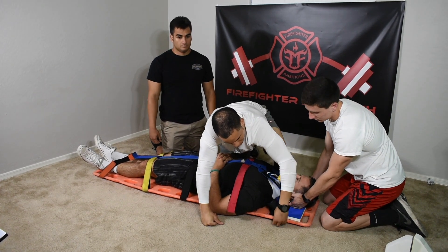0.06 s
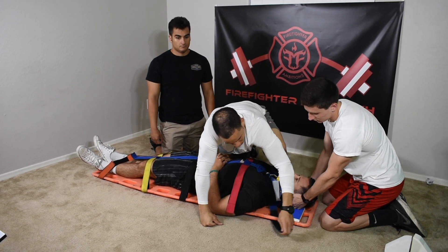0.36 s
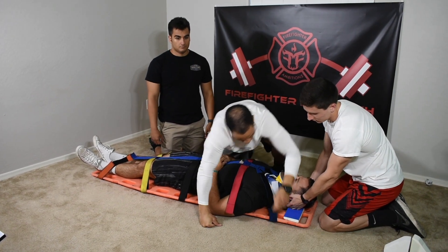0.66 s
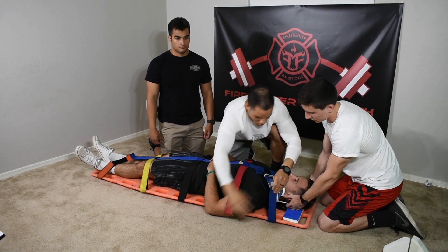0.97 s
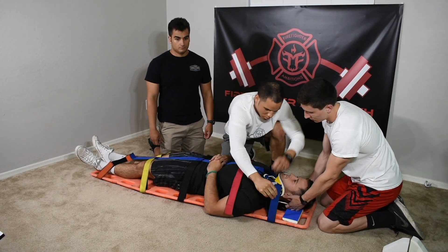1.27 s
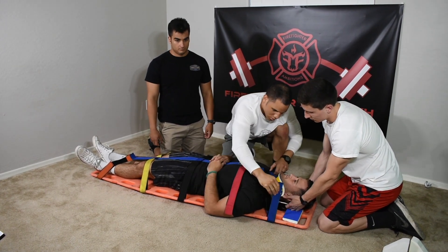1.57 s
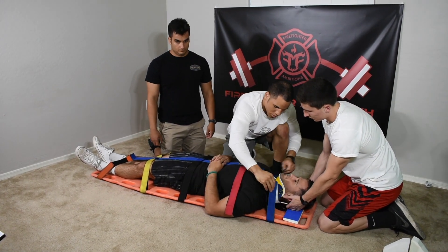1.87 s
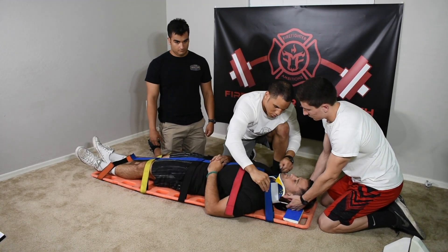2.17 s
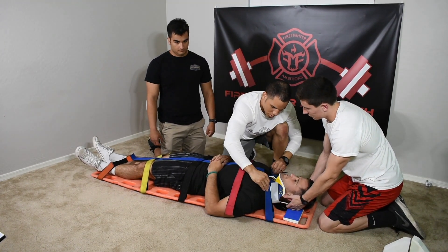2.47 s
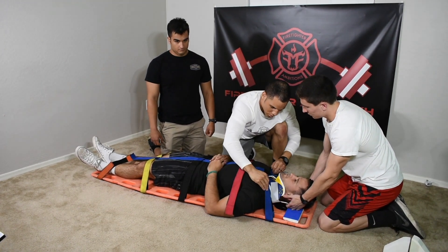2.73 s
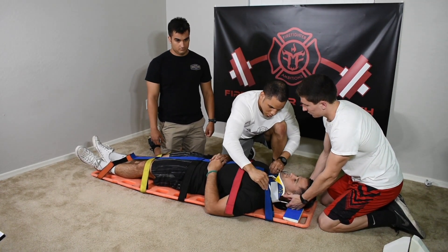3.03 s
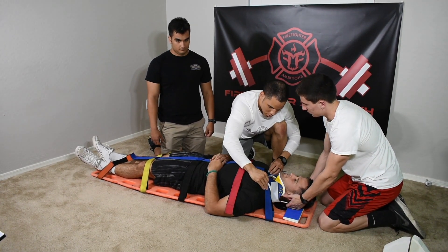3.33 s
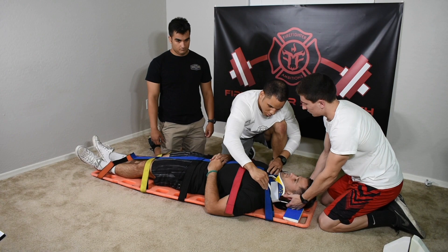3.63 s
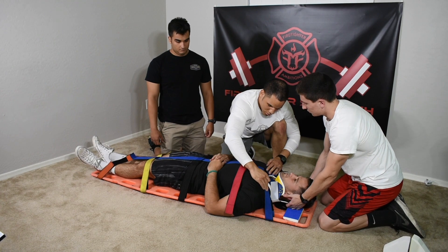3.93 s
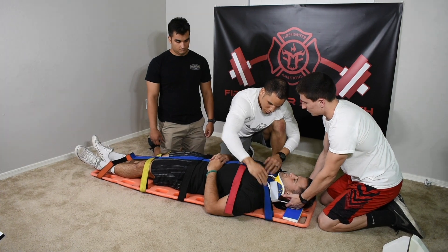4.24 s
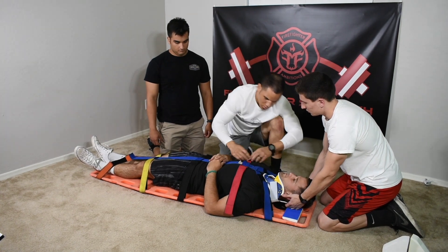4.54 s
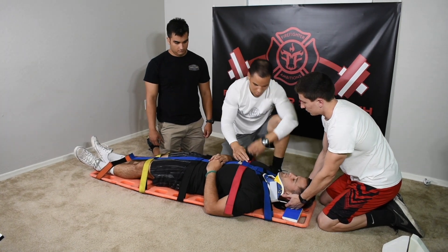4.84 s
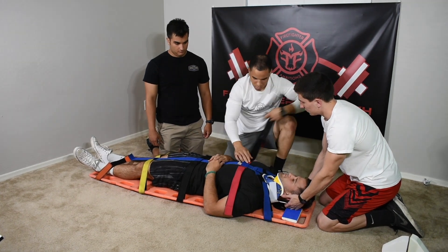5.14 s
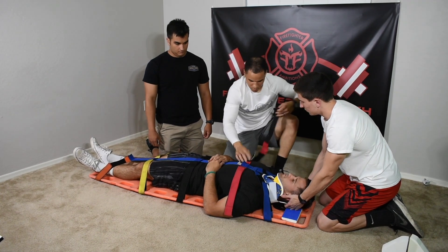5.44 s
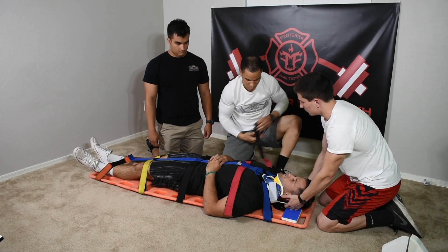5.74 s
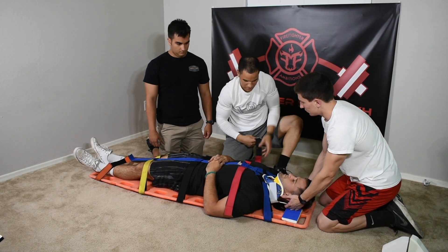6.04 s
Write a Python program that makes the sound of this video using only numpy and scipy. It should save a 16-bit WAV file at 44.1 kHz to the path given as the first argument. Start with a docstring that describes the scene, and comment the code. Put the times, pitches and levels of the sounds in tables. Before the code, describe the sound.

Hook-and-loop straps are pulled open close to the microphone in a small room. First comes a brief scratchy rip, then rustling cloth, a light bump on a plastic collar and a second, sharply crackling rip. Quiet scuffs and ticks of single hooks follow, until a longer tearing rip of about half a second. Rustling and faint squeaks finish it, with a low hum and slight hiss underneath throughout.

```python
"""Hook-and-loop straps are pulled open on a person lying on a rescue board in a small carpeted room.
From the start an appliance hums under a faint hiss, and sleeves and webbing rustle. At 0.4 s a strap rips
briefly as a shower of tiny hooks lets go; then a knee shifts on the floor. Single hooks tick, a plastic
neck collar is bumped and scuffed, and at 1.9 s a strap is jerked open. Softer handling follows until the
longest rip, from 4.8 to 5.3 s. Near the end, cloth squeaks faintly on plastic."""
import sys
import numpy as np
from scipy import signal
from scipy.fft import rfft, irfft
from scipy.io import wavfile
from scipy.ndimage import uniform_filter1d

SR = 44100
rng = np.random.default_rng(int(sys.argv[2]) if len(sys.argv) > 2 else 0)


def wrap_up_sound(samples):
    """Save the sound to the file named by the first command line argument, as 16-bit audio."""
    columns = np.atleast_2d(samples).T
    # keep every value between -1 and 1, then stretch to whole-number steps
    tamed = np.clip(columns, -1, 1)
    steps = np.round(tamed * 32767).astype(np.int16)
    wavfile.write(sys.argv[1], SR, steps)


N = 273420  # samples: 6.2 s


def amp(db):
    """Turns decibels into a factor to multiply by."""
    return 10 ** (np.asarray(db) / 20)


def evened(x):
    """Scales a signal to an average power of 1."""
    return x / np.sqrt(np.mean(x ** 2) + 1e-20)


def read(points, hz):
    """Looks up frequencies in a table, giving every octave equal space."""
    f, value = np.transpose(points)
    return np.interp(np.log(hz + 1), np.log(f + 1), value)


def add(mix, s, sound):
    """Mixes a sound in, starting at s seconds."""
    part = mix[max(round(s * SR), 0):][:len(sound)]
    part += sound[:len(part)]


def split_click(spectrum, low_hz=700, high_hz=6000, size=4096):
    """A click with this tone colour, split into bass, middle and treble of equal energy."""
    hz = abs(np.fft.fftfreq(size, 1 / SR))
    log_gain = np.log(amp(np.maximum(read(spectrum, hz), -70)))
    click = np.exp(signal.hilbert(log_gain).conj())  # a sharp start, then the ring
    low, high = (1 / (1 + (hz / edge) ** 8) for edge in (low_hz, high_hz))
    bands = np.array([low, high - low, 1 - high])
    parts = np.fft.fftshift(np.fft.ifft(click * bands).real, axes=1)
    return parts / np.linalg.norm(parts, axis=1, keepdims=True)


def play_clicks(kicks, clicks, levels_db):
    """Every kick sets off a click, with its own levels for bass, middle and treble."""
    start = clicks.shape[1] // 2
    return sum(signal.fftconvolve(kicks * amp(db), click)[start:] for db, click in zip(levels_db, clicks))


def shower(count, per_s, spread_db):
    """Tiny kicks of uneven size at random moments, about per_s of them a second."""
    chance = per_s / SR
    sizes = evened(amp(spread_db * np.minimum(rng.exponential(1, count), 3)))
    signs = rng.choice([-1, 1], count)
    happens = rng.random(count) < chance
    return sizes * signs * happens / np.sqrt(chance)


def fuzzy_tone(hz, width_hz):
    """A soft swell of narrow noise that follows the pitch curve hz."""
    smoothing = signal.butter(2, width_hz / 2, fs=SR, output="sos")
    wobble = signal.sosfilt(smoothing, rng.standard_normal((len(hz), 2)) @ [1, 1j])
    tone = np.exp(2j * np.pi * np.cumsum(hz) / SR)
    return evened((wobble * tone).real) * signal.windows.tukey(len(hz), .5)


# tone colour of the room's hiss and of the microphones' own noise: f/Hz, relative level/dB
AIR_COLOUR = [(15, -65), (25, -37), (36, -13.5), (59, -6), (87, -7.5), (108, -5), (223, -6.5), (249, -14),
              (317, -6), (531, -10), (840, -13), (988, -11.5), (2280, -18.5), (16000, -23.5)]
MIC_COLOUR = [(18, -41), (30, -11), (90, 7), (168, 2), (213, 10.5), (5040, -11.5), (9190, -25), (11300, -4),
              (15500, -6.5)]
def hiss(colour):
    """Steady noise with this tone colour."""
    hz = np.fft.rfftfreq(N, 1 / SR)
    white = rfft(rng.standard_normal(N))
    return evened(irfft(white * amp(read(colour, hz)), N))


# how loud the appliance's lowest note is: t/s, level/dB
HUM_LEVELS = [(0, -70), (1.6, -70), (2.1, -62), (3.1, -64.5), (4.0, -67.5), (5.4, -61.5), (6.2, -68)]
def hum(mains_hz=60, beat_s=1.097, dip_s=2.61, motor_db=-8.5):
    """Mains hum and a slightly slower motor throb together, under a wavering note an octave up."""
    t = np.arange(N) / SR
    phase = 2 * np.pi * mains_hz * t
    lag = 2 * np.pi * (t - dip_s) / beat_s
    motor = amp(motor_db) * np.sin(phase - lag)
    drone = amp(np.interp(t, *np.transpose(HUM_LEVELS))) * (np.sin(phase) - motor)
    waver = evened(sum(np.sin(2 * np.pi * (f * t + rng.random())) for f in np.geomspace(.5, 7, 20)))
    octave = amp(-63.5 + 1.8 * waver) * np.sin(2 * phase + 0.19 * waver)
    return np.sqrt(2) * (drone + octave)


# how long the room takes to fade by 60 dB: f/Hz, fade/s
ROOM_FADE = [(120, 0.5), (300, 0.48), (700, 0.46), (2000, 0.35), (5000, 0.37), (9000, 0.3), (15000, 0.64)]
# echoes from nearby surfaces: delay/s, level/dB
NEAR_ECHOES = [(.0013, -12.5), (.0043, -19.5), (.0062, -25), (.0078, -9), (0.0122, -7), (0.0175, -26.5)]
def reflections(tail_db, early_db=5, early_s=0.067):
    """The room's answer to a click: a few near echoes and a dense tail that falls fast at first."""
    count = SR // 2
    hz, t, noise = signal.stft(rng.standard_normal(count), SR, nperseg=256)
    fall_db = -60 * t / read(ROOM_FADE, hz)[:, None] + early_db * np.exp(-t / early_s)
    tail = signal.istft(noise * amp(fall_db), SR, nperseg=256)[1][:count]
    tail *= np.clip(np.arange(count) / SR / 0.0023, 0, 1)
    response = amp(tail_db) * tail / np.linalg.norm(tail)
    for s, db in NEAR_ECHOES:
        add(response, s * rng.uniform(.8, 1.2), amp([db]))
    return response


def room(x, tail_db, spots=6, rounds_per_s=9):
    """Hooks and fibres sound from many spots, so the sound cycles through several echo patterns."""
    spot = rounds_per_s * spots * np.arange(N) / SR
    echoes = np.zeros(N)
    for k in range(spots):
        response = reflections(tail_db)
        away = (spot - k + spots / 2) % spots - spots / 2
        share = np.cos(np.pi / 2 * np.clip(away, -1, 1))
        echoes += signal.fftconvolve(x * share, response)[:N]
    return (x + echoes) / np.sqrt(1 + np.sum(response ** 2))


# a knee shifts on the carpet: t/s, length/s, f/Hz, level/dB
KNEE_SHIFT = (0.8, 0.8, 95.5, -59.5)
def knee():
    """The floor answers a shift of weight with a soft, low rumble."""
    out = np.zeros(N)
    s, length, hz, db = KNEE_SHIFT
    add(out, s, amp(db) * fuzzy_tone(np.full(int(length * SR), hz), width_hz=24))
    return out


# cloth rubs on plastic: t/s, length/s, first f/Hz, last f/Hz, level/dB
CLOTH_SQUEAKS = [(5.861, 0.055, 621, 520, -56), (6.082, 0.059, 1222, 1297, -54.5),
                 (6.127, 0.08, 2265, 1860, -52)]
def squeaks():
    """The ribs of the weave pass an edge: a fuzzy whistle whose pitch follows their speed."""
    out = np.zeros(N)
    for s, length, first_hz, last_hz, db in CLOTH_SQUEAKS:
        glide_hz = np.geomspace(first_hz, last_hz, int(length * SR))
        add(out, s, amp(db) * fuzzy_tone(glide_hz, width_hz=0.13 * first_hz))
    return out


# the notes of the hollow collar: f/Hz, level/dB
COLLAR_NOTES = [(283, -0.5), (335, -6), (428, -11), (570, -19.5)]
# pushes on the collar: t/s, level/dB, length/s
COLLAR_BUMPS = [(1.71, -30, 0.032), (2.322, -49, 0.029), (4.27, -44, 0.035)]
def bumps():
    """The hollow collar sounds while it is pushed; the hand stills it straight after."""
    out = np.zeros(N)
    for s, db, length in COLLAR_BUMPS:
        t = np.arange(int(length * SR)) / SR
        ring = sum(amp(note_db) * np.sin(2 * np.pi * hz * t) for hz, note_db in COLLAR_NOTES)
        add(out, s, amp(db) * ring * signal.windows.tukey(len(t), .5))
    return out


# the small rustle as bodies shift and settle: t/s, level/dB
FIDGET_LEVELS = [(0, -60), (1.1, -54), (1.7, -53.5), (2.25, -61), (3.0, -62.5), (3.5, -58), (4.08, -65),
                 (4.5, -56.5), (5.75, -60), (6.1, -56)]
# a sleeve or webbing slides: centre t/s, length/s, level/dB, extra bass/dB, extra treble/dB
CLOTH_SLIDES = [(0.032, 0.12, -52.5, 4.5, -3), (0.073, 0.1, -51.5, 7, -3), (0.105, 0.14, -44.5, -3.5, -4.5),
                (0.447, 0.46, -53, 3, -2), (0.684, 0.085, -47.5, -10, -3), (0.79, 0.25, -44, -6, 2.5),
                (1.033, 0.27, -57, -1, 1), (1.262, 0.11, -48, 1, 1), (1.363, 0.2, -45, -25, 3),
                (1.546, 0.19, -53.5, 2, 12), (1.63, 0.13, -51, 2, 6.5), (1.716, 0.15, -47, -6, 6.5),
                (2.355, 0.11, -55.5, -2.5, 8.5), (2.536, 0.17, -61.5, -5, 9.5), (2.84, 0.29, -56.5, -7, -4),
                (3.297, 0.34, -55, -8, -5), (3.64, 0.14, -52.5, -4, 3), (3.909, 0.085, -54, -11, -2),
                (4.255, 0.13, -53.5, 4.5, 10), (4.31, 0.22, -51, 1, -3), (4.756, 0.44, -49, -26, 2),
                (5.418, 0.66, -52, -1.5, 1), (5.875, 0.092, -49, -7, 1.5), (5.933, 0.08, -52, -8, 2),
                (6.2, 0.31, -47, -20, 2.5)]
def cloth_levels(skew=0.96, roundness=1.82):
    """Bass, middle and treble of the cloth in dB: each slide swells and fades over the small rustle."""
    t = np.arange(N) / SR
    fidget_db = np.interp(t, *np.transpose(FIDGET_LEVELS))
    power = amp([fidget_db - 3, fidget_db, fidget_db + 1]) ** 2
    for centre, length, db, bass_db, treble_db in CLOTH_SLIDES:
        during = abs(t - centre) < length / 2
        progress = np.clip((t[during] - centre) / length + .5, 0, 1)
        swell = abs(np.sin(np.pi * progress ** skew)) ** roundness
        power[:, during] += (swell * amp([[db + bass_db], [db], [db + treble_db]])) ** 2
    return 10 * np.log10(power)


# tone colour of a slipping fibre: f/Hz, relative level/dB
CLOTH_COLOUR = [(100, -33.5), (170, -11.5), (240, -1.5), (330, -3.5), (420, -8.5), (900, -14), (1400, -11),
                (2300, -10.5), (3300, -12), (5400, -10), (7300, -3), (9200, -2), (11000, -13.5),
                (16000, -25)]
def rustles(clump_db=1.37):
    """Sleeves and webbing slide: countless fibres slip, a few of them harder."""
    slips = shower(N, per_s=4200, spread_db=4.5)
    # the cloth sticks and frees itself, so the slips come in clumps
    clumps = evened(uniform_filter1d(uniform_filter1d(rng.standard_normal(N), size=700), size=200))
    return play_clicks(slips * amp(clump_db * clumps), split_click(CLOTH_COLOUR), cloth_levels())[:N]


# tone colour of a scrape on plastic: f/Hz, relative level/dB
SCUFF_COLOUR = [(180, -18), (300, 7), (414, -1), (738, -14), (1140, -1), (1430, 0), (1520, -4), (2350, 0),
                (3930, -6), (8240, -6), (14000, -31)]
# the notes of the collar's thin rim: f/Hz, relative level/dB, time to fade by 60 dB/s
RIM_NOTES = [(1210, 5, 0.008), (1610, 4, 0.0082), (2360, 5.5, 0.0055), (3440, -4, 0.007)]
# webbing catches on the collar: t/s, level/dB, fade/s, extra treble/dB, extra bass/dB, rim/dB, grip
COLLAR_SCUFFS = [(0.297, -38, 0.092, 4.5, -6, -5, 1), (0.475, -29, 0.057, 6, -9, -4, 1.43),
                 (1.853, -30.5, 0.063, 6, -20, -1, 1.65), (2.905, -45, 0.07, -4, -16, -0.5, 1.22),
                 (3.224, -45, 0.079, -11, -12, 7, 1.43), (3.748, -37.5, 0.088, -6, -16, -0.5, 1.3),
                 (4.258, -42.5, 0.22, -5, -5, -1, 1), (4.373, -42, 0.15, -1.5, -12, -1, 1.42),
                 (4.754, -37.5, 0.11, 6, -26, -15, 1.5), (4.799, -34, 0.07, 4, -22, -5, 1.17),
                 (5.853, -50.5, 0.069, 11, -7, -10, 1)]
def scuffs():
    """A quick scrape on plastic: a burst of slips that dies away and rattles the rim."""
    out, clicks = np.zeros(N), split_click(SCUFF_COLOUR)
    t = np.arange(SR // 4) / SR
    for s, db, fade_s, treble_db, bass_db, rim_db, grip in COLLAR_SCUFFS:
        # a firmer grip stiffens the rim and raises its notes
        rim = sum(amp(note_db - 60 * t / ring_s) * np.sin(2 * np.pi * hz * grip * t)
                  for hz, note_db, ring_s in RIM_NOTES)
        burst = np.minimum(t / 0.003, 1) * amp(-60 * t / fade_s)
        slips = burst * shower(len(t), per_s=4000, spread_db=2.0)
        add(out, s, amp(db) * play_clicks(slips, clicks, (bass_db, -2, treble_db)))
        add(out, s, amp(db + rim_db) * signal.fftconvolve(slips, rim / np.linalg.norm(rim)))
    return out


# tone colour of one hook's tick: f/Hz, relative level/dB
HOOK_COLOUR = [(100, -20), (400, -30.5), (1400, -6.5), (2300, -1.5), (3600, 0), (5500, -0.5), (7500, 6.5),
               (9200, 9.5), (11000, 1.5), (16000, -26)]
# single hooks let go: t/s, level/dB, extra treble/dB
HOOK_SNAPS = [(0.2817, -27.5, 9), (0.3038, -22, 8), (0.4785, -15, 4), (0.817, -27, -1), (1.0511, -20.5, 1),
              (1.197, -25.5, 2), (1.5225, -32, 20), (1.616, -25, 11), (1.786, -19, -3), (1.8299, -21, 9),
              (1.8532, -4.5, -4), (1.8547, 1.5, -8), (1.8952, 2.5, -4), (1.8992, 0.5, -7), (1.9033, 0, -11),
              (1.9212, 1.5, 3), (1.9243, -1.5, -1), (1.9262, -6, -1), (1.9324, -0.5, -4), (1.9434, -4, -1),
              (1.9466, -2, -1), (1.9534, -5, 3), (1.985, -5, -3), (2.531, -34.5, 18), (2.718, -31.5, 20),
              (2.807, -38, 15), (2.8515, -25, -5), (2.9085, -28, -4), (3.184, -35.5, 19.5),
              (3.7512, -22, -14), (4.222, -39, 17), (4.228, -37, 20), (4.7537, -13, -2), (4.799, -15, -3)]
def snaps():
    """A hook that holds longer than the others lets go with one sharp tick."""
    out, clicks = np.zeros(N), split_click(HOOK_COLOUR)
    for s, db, treble_db in HOOK_SNAPS:
        add(out, s, amp(db) * play_clicks(np.ones(1), clicks, (-15, 0, treble_db)))
    return out


# tone colour of the stretched tape: f/Hz, relative level/dB
TAPE_COLOUR = [(59, -44), (100, -22), (185, -30.5), (249, -16), (373, -22.5), (502, -15.5), (691, -21.5),
               (930, -12), (1010, -20.5), (1170, -9.5), (1310, -12), (1720, -8.5), (4670, -7), (8640, -1),
               (16000, -33.5)]
# how hard each of three straps is pulled as it opens: t/s, level/dB, extra treble/dB
SHORT_RIP = [(0.355, -50, -3), (0.361, -39, 3), (0.387, -34, 5), (0.467, -41.5, 6), (0.475, -31, 1.5),
             (0.56, -49, 2)]
JERKED_RIP = [(1.9, -30, -9), (1.925, -29.5, -2), (1.96, -30, -4), (1.972, -24.5, 1.5), (2.0, -26, -4),
              (2.017, -37.5, 4)]
LONG_RIP = [(4.798, -35, -1), (4.86, -34, -1.5), (4.909, -22.5, 0), (4.995, -21, 5.5), (5.018, -21.5, 8.5),
            (5.175, -23, 6), (5.22, -26, 1), (5.285, -25.5, 8.5), (5.324, -30.5, -2)]
# the tape in those three rips: extra bass/dB, hooks per second, unevenness/dB
RIP_TEXTURES = [(-12.5, 4200, 2.5), (-7, 480, 4), (-18, 2700, 2)]
def rips(fade_s=0.0022):
    """Hooks let go in a dense shower and shake the stretched tape."""
    out, clicks = np.zeros(N), split_click(TAPE_COLOUR)
    for pull, (bass_db, per_s, spread_db) in zip((SHORT_RIP, JERKED_RIP, LONG_RIP), RIP_TEXTURES):
        times, *columns = np.transpose(pull)
        t = np.arange(times[0], times[-1], 1 / SR)
        db, treble_db = (np.interp(t, times, column) for column in columns)
        soft_ends = np.clip(np.minimum(t - t[0], t[-1] - t) / fade_s, 0, 1)
        hooks = soft_ends * shower(len(t), per_s, spread_db)
        add(out, times[0], play_clicks(hooks, clicks, (db + bass_db, db, db + treble_db)))
    return out


def scene():
    """All the sounds together, straight ahead of two close microphones."""
    straps = room(rips() + rustles() + snaps() + scuffs() + squeaks(), tail_db=1.0)
    bass_cut = signal.butter(2, 130, "high", fs=SR, output="sos")  # light tape gives off no deep bass
    straps = signal.sosfilt(bass_cut, straps)
    collar = bumps()
    collar_echo = amp(-9.5) * signal.fftconvolve(collar, reflections(tail_db=7.5))[:N]
    middle = straps + collar + collar_echo + knee() + hum() + amp(-55.5) * hiss(AIR_COLOUR)
    side = amp(-65) * hiss(MIC_COLOUR)
    # the difference between the two channels swells faintly with the strap sounds
    side += amp(-43) * signal.fftconvolve(straps, reflections(tail_db=-44))[:N]
    return np.array([middle + side, middle - side])


def record(dry, top_hz=15850):
    """Clips any peak that is too tall, then removes the very highest treble."""
    clipped = np.clip(dry, -.9, .9)
    treble_cut = signal.firwin(511, top_hz, window=("kaiser", 9), fs=SR)
    return signal.oaconvolve(clipped, treble_cut[None], "same", axes=1)


dry = scene()
out = record(dry)
wrap_up_sound(out)
```